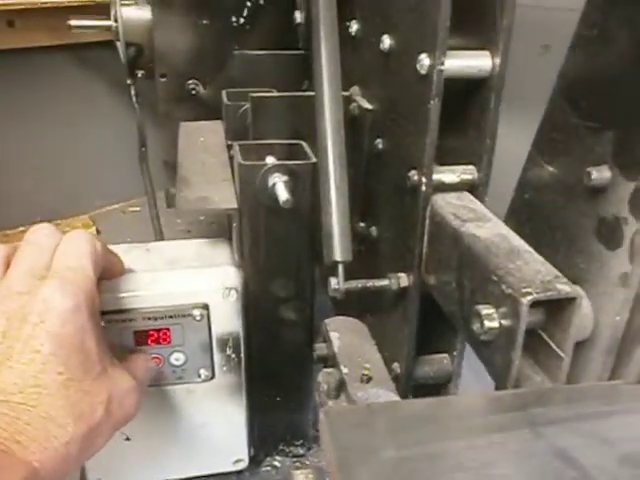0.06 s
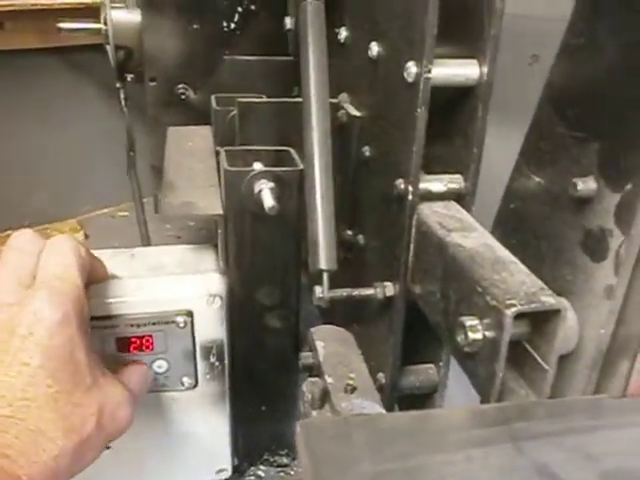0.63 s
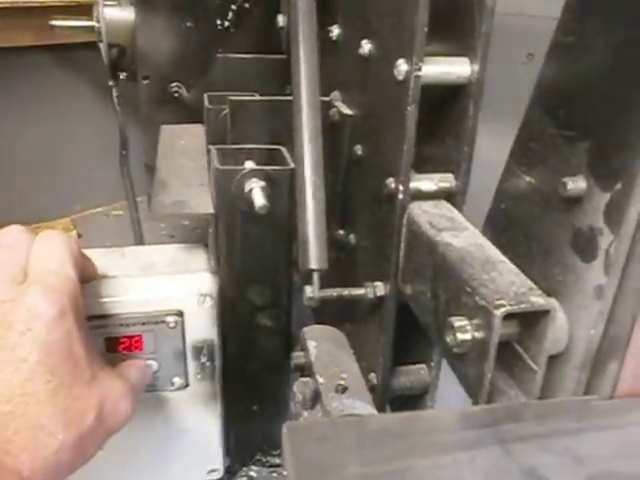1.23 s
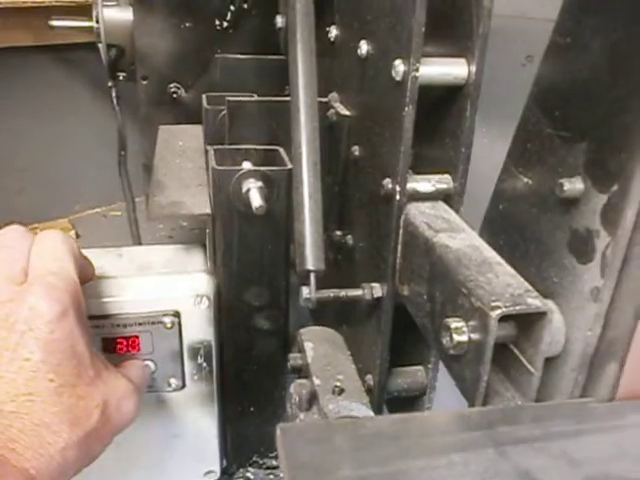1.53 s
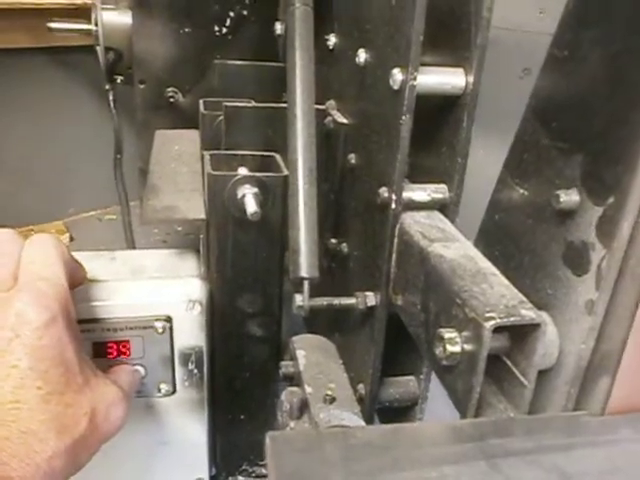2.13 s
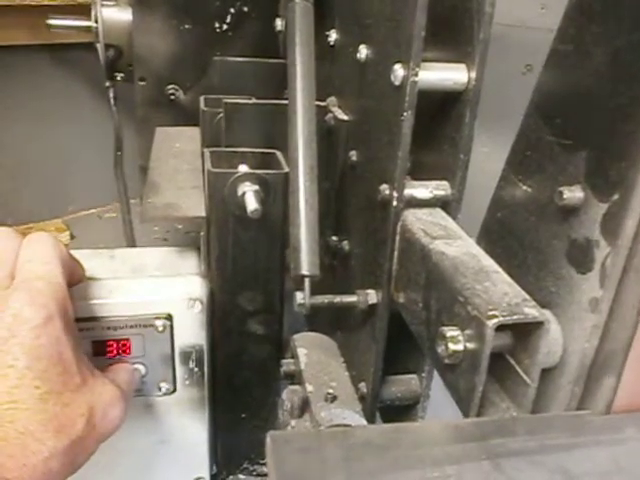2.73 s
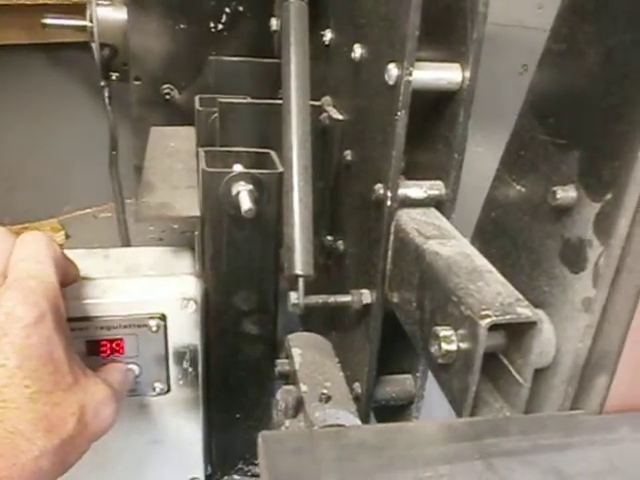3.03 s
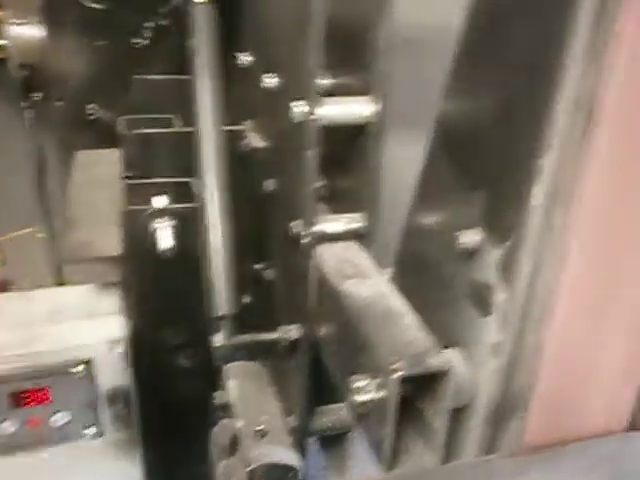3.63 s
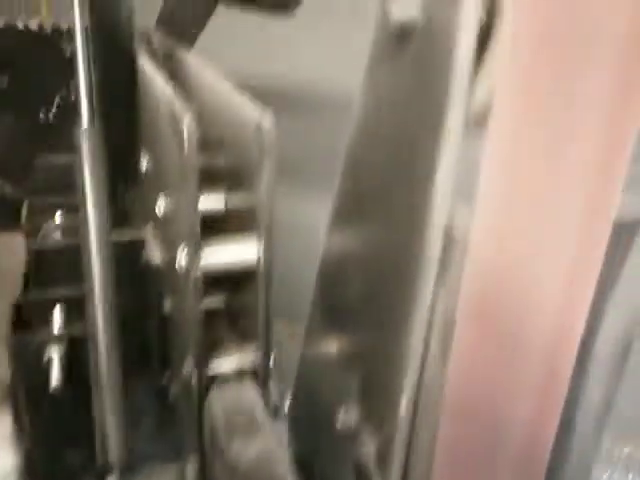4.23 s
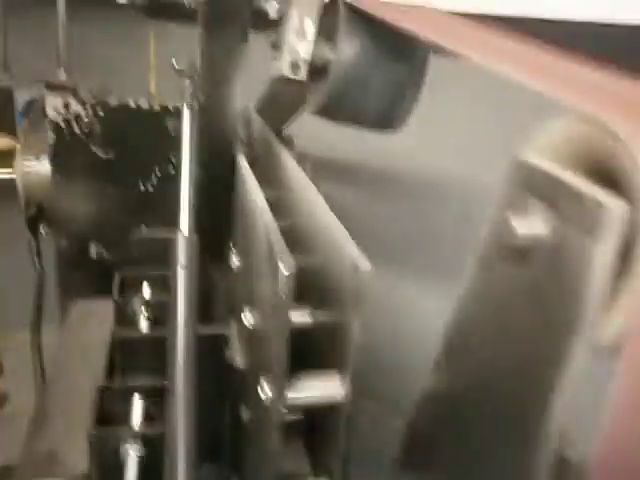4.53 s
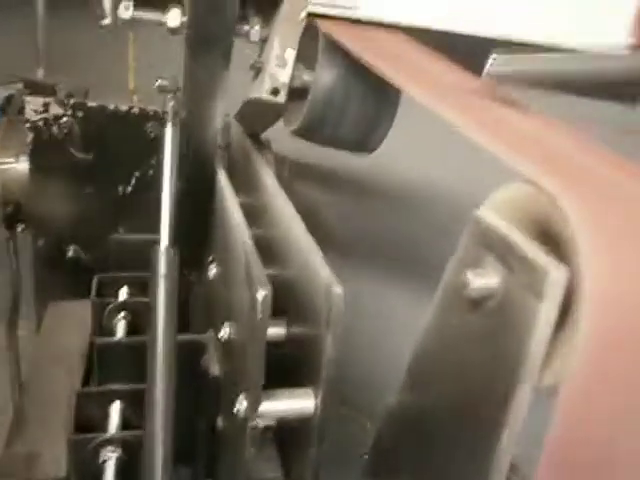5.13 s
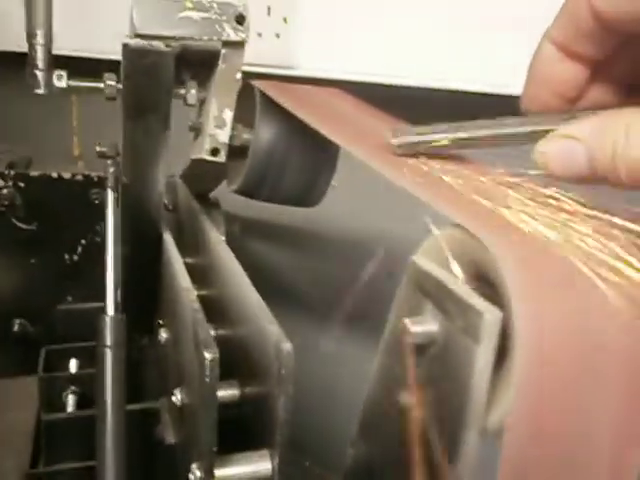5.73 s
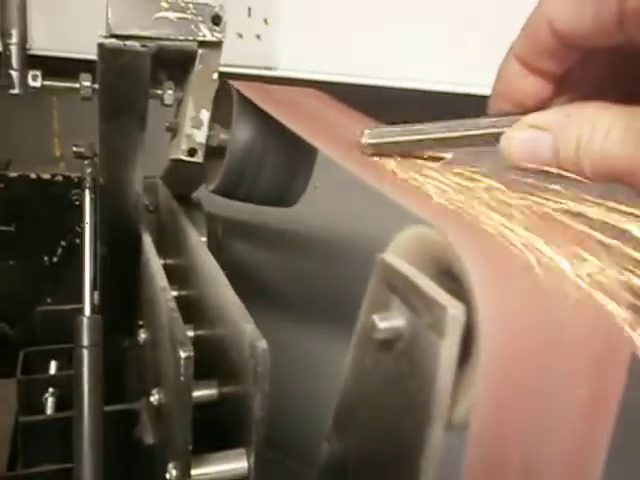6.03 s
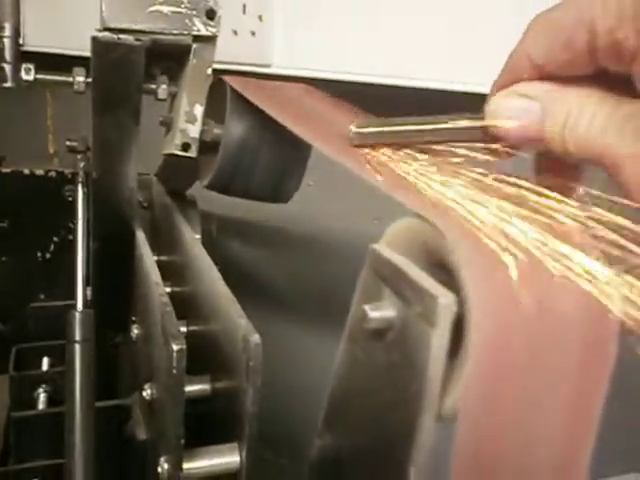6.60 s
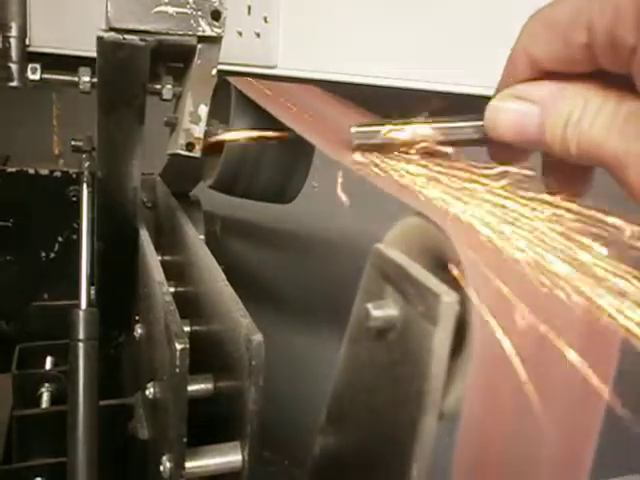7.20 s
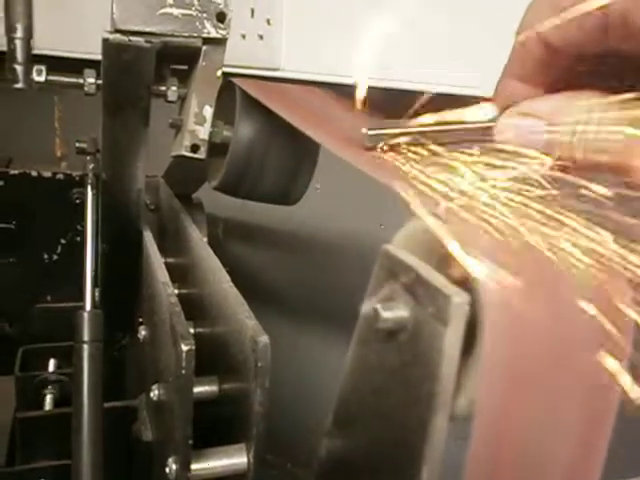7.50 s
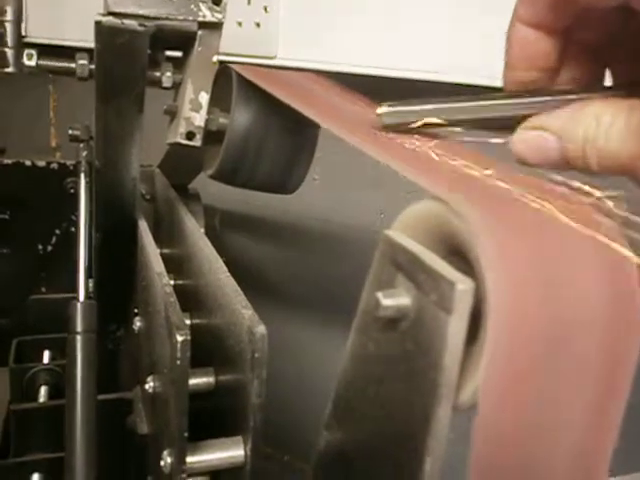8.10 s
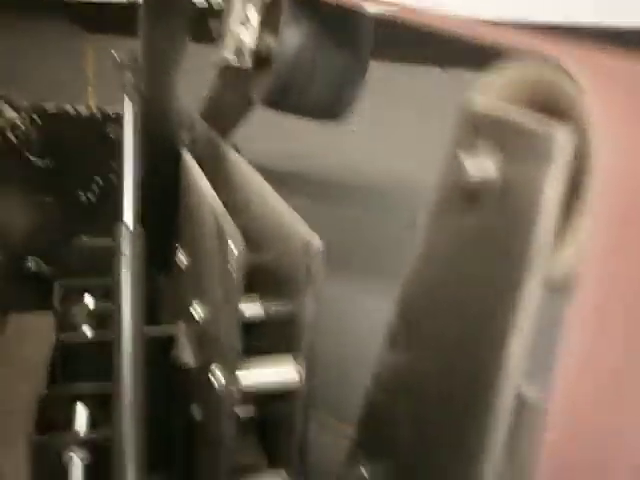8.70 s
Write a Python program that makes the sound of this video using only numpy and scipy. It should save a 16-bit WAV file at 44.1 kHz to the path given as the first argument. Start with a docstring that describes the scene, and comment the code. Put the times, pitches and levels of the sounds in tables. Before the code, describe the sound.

A belt grinder hums and growls up to full speed, rattling and throbbing, then a steel rod rasps against its belt.

```python
"""A home-built belt grinder hums, buzzes and growls while its belt hisses over the wheels.
It is turned up to full speed: the loose steel frame rattles harder and the tool arm chatters.
The microphone moves over to the belt; the off-balance motor now beats (throbs) against the mains hum,
and on each beat the frame rattles and a thin guard plate rings harder. Then a steel rod rasps on the
belt, slowing the motor, and is lifted off. All along, the close microphone is dull and clips on peaks."""
import sys
import numpy as np
from scipy import signal
from scipy.fft import rfft, irfft
from scipy.io import wavfile
from scipy.ndimage import uniform_filter1d, minimum_filter1d

SR = 44100
rng = np.random.default_rng(int(sys.argv[2]) if len(sys.argv) > 2 else 0)


def inscribe(sig):
    """Save sig as 16-bit PCM at rate SR to the path in sys.argv[1].

    A 1-D sig is mono; a 2-D sig holds one channel per row.
    Samples are clipped to [-1, 1] before scaling.
    """
    pcm = np.round(np.clip(np.atleast_2d(sig).T, -1, 1) * 32767)
    wavfile.write(sys.argv[1], SR, pcm.astype(np.int16))


N = 394694
TIME = np.arange(N) / SR
MAINS_HZ, FULL_SPEED_HZ = 50, 100  # the power supply; motor turns per second
FIELD_PER_TURN = 1.023  # the motor's magnetic field spins just ahead of its shaft
LAPS_PER_TURN = .072  # belt laps for each motor turn

# notes at which the steel frame rings: f/Hz, width/Hz, level/dB
FRAME_MODES = [(608, 37, -15), (780, 7.3, -18.5), (905.2, 26.2, 4), (910, 71, -8.5), (1184, 28, -7.5),
               (1248, 98, -1.5), (1470, 62, -2.5), (1608.7, 15.6, 11), (1633.5, 50, -5.5), (1797, 58, -4.5),
               (2378, 84, -23), (3380, 170, -21.5), (3660, 83, -13)]


def undb(db):
    """Turn decibels into a factor to multiply by."""
    return 10 ** (np.asarray(db) / 20)


def unit(x):
    """Scale a signal to an average (rms) level of 1."""
    return x / np.sqrt(np.mean(np.abs(x) ** 2))


def colour(x, spectrum):
    """Shape a sound's lows and highs by (f/Hz, level/dB) points, then scale it to level 1."""
    hz, db = np.transpose(spectrum)
    bin_hz = np.arange(N // 2 + 1) * SR / N
    gain = undb(np.interp(np.log(bin_hz + 1), np.log(hz), db))
    return unit(irfft(rfft(x) * gain, N))


def noise():
    """White noise: an even hiss."""
    return rng.standard_normal(N)


def smooth(x, seconds):
    """A moving average."""
    return uniform_filter1d(x, max(1, int(seconds * SR)))


def wander(per_s):
    """Glide to a new random value per_s times a second; typical size 1."""
    held = rng.standard_normal(4096)[(TIME * per_s).astype(int) % 4096]
    return unit(smooth(held, 1 / per_s))


def bell(x, centre, spread):
    """A smooth hump of height 1."""
    return np.exp(-((x - centre) / spread) ** 2 / 2)


def tone(cycles, db):
    """A pure tone that follows a running count of cycles."""
    return np.sqrt(2) * undb(db) * np.cos(2 * np.pi * cycles)


def ring(x, modes):
    """Let a signal ring an object's own notes, given as (f/Hz, width/Hz, level/dB)."""
    return sum((-1) ** k * undb(db) * signal.lfilter(*signal.iirpeak(hz, hz / width, SR), x)
               for k, (hz, width, db) in enumerate(modes))


def near_belt(move_s=(3.4, 4.35)):
    """Where the microphone is: 0 at the control box, 1 at the belt."""
    return np.interp(TIME, move_s, [0, 1])


def settling(fade_s=.4):
    """Falls from 1 towards 0, so that hum, buzz and rumble start louder."""
    return np.exp(-TIME / fade_s)


def octaves(speed):
    """Doublings of the speed: 0 at full speed, -1 at half."""
    return np.log2(speed / FULL_SPEED_HZ)


def stand_response(hz):
    """How strongly the stand answers a shake at this frequency."""
    # where the stand shakes most easily: f/Hz, width/Hz, level/dB
    stand_modes = [(97.5, 5.9, 0), (118, 3.9, -2.7), (198.7, 5, -4.8)]
    return np.sqrt(sum(undb(db) ** 2 / (1 + ((hz ** 2 - centre ** 2) / (hz * width)) ** 2)
                       for centre, width, db in stand_modes))


def vibration(turns, speed):
    """Off-balance weight, magnetic pull and mains hum shake the frame; close pitches beat."""
    unbalance = undb(-10.1) * (speed / FULL_SPEED_HZ) ** 2 * stand_response(speed)
    pull = undb(-21.4) * stand_response(2 * speed)
    hum = undb(-21.3 - 2.5 * near_belt() + 7.5 * settling())
    parts = [(turns, unbalance), (2 * turns, pull), (2 * MAINS_HZ * TIME, hum)]
    # complex numbers: .real is the sound, abs() is the strength of the shaking
    return np.sqrt(2) * sum(size * np.exp(2j * np.pi * cycles) for cycles, size in parts)


def throb(shake, average_s=.5):
    """Strength of the shaking against its nearby average: above 1 at the top of a beat."""
    strength = np.abs(shake)
    return strength / smooth(strength, average_s)


def mains_buzz(waver_db=2):
    """The power supply buzzes in the control box, fainter once the microphone moves away."""
    # tones of the buzz: multiple of the mains frequency, level/dB
    buzz_tones = [(1, -45), (3, -46.5), (4, -38), (5, -40), (6, -44), (7, -44.5), (8, -44.5), (9, -46),
                  (11, -40.5), (13, -44), (15, -44.5)]
    change_db = -9 * near_belt() + 4 * settling()
    return sum(tone(round(k) * MAINS_HZ * TIME + rng.random(), db + change_db + waver_db * wander(4.7))
               for k, db in buzz_tones)


def belt(turns):
    """The belt hisses over its wheels, a little unevenly on each lap; the bearings rumble."""
    # tone colours of the belt and of the bearings: f/Hz, level/dB
    hiss_spectrum = [(200, -16.5), (400, -2), (560, 0.5), (760, -1.5), (920, 2), (1100, -1), (1450, 1),
                     (2000, -1.5), (2300, -8), (2900, -5), (3300, -2.5), (3600, 0.5), (3950, -5.5),
                     (4400, -24.5)]
    rumble_spectrum = [(20, -47.5), (40, -17), (75, -5), (115, 12), (160, 5.5), (230, -1), (300, -9),
                       (420, -18), (900, -39)]
    hiss_db = -26.5 - 6 * bell(TIME, 3.46, .13)  # the hiss dips briefly
    uneven_db = 1.05 * wander(30) + .17 * np.cos(2 * np.pi * LAPS_PER_TURN * turns)
    rumble_db = -31.5 + 2.5 * near_belt() + 7 * settling()
    hiss = undb(hiss_db + uneven_db) * colour(noise(), hiss_spectrum)
    return hiss + undb(rumble_db) * colour(noise(), rumble_spectrum)


def mount_growl(turns, speed, waver_db=4, drift_cycles=.1):
    """The motor's uneven push sweeps up through the notes of its mount, loudest at middling speeds."""
    # notes of the motor mount: f/Hz, width/Hz, level/dB
    mount_modes = [(207, 29, 1.5), (293, 43, 2), (380, 42, -9.5), (571, 23, 1)]
    # loudness of the growl: motor speed/Hz, level/dB
    growl_levels = [(42, -37.5), (72, -30), (85, -31.5), (97, -49)]
    ripple = sum(tone(k / 2 * FIELD_PER_TURN * turns + drift_cycles * wander(20), waver_db * wander(9))
                 for k in range(4, 28))
    level_db = np.interp(speed, *np.transpose(growl_levels))
    return unit(ring(ripple, mount_modes)) * undb(level_db)


def swell_db():
    """Extra level in the moments when the guard plate rings out."""
    # swells of the ringing: t/s, spread/s, lift/dB
    swells = [(4.12, .14, 6.5), (5.88, 0.12, 10.5), (6.45, 0.11, 6), (8.881, 0.17, 17)]
    return sum(db * bell(TIME, at_s, spread_s) for at_s, spread_s, db in swells)


def rattle_force(turns, speed, shake, wheel_per_turn=.607, swell_share=.26):
    """The frame rattles harder with speed, and on each beat, turn of the free wheel and belt lap."""
    wheel_db = 1.82 * np.cos(2 * np.pi * wheel_per_turn * turns)
    lap_db = .05 * np.cos(2 * np.pi * LAPS_PER_TURN * turns)
    level_db = -22.5 + 17.5 * octaves(speed) + 3 * near_belt()
    return undb(level_db + swell_share * swell_db() + wheel_db + lap_db) * throb(shake) ** .88


def knocks(turns, jitter_s, scatter_db=2.5, return_db=-6):
    """A loose joint knocks at both ends of each swing, softer and less evenly on the way back."""
    swing_ends = np.flatnonzero(np.diff(np.floor(2 * turns)))
    timing, strength = rng.standard_normal((len(swing_ends), 2)).T
    backward = np.arange(len(swing_ends)) % 2 == 0
    offset = (jitter_s * SR * timing * (1 + 2 * backward)).astype(int)
    landing = np.clip(swing_ends + offset, 0, N - 1)
    return np.bincount(landing, undb(scatter_db * strength + return_db * backward), N)


def frame_rattle(turns, force):
    """Knocks ring the steel frame, and small parts clatter once a turn."""
    # tone colour of the small parts: f/Hz, level/dB
    clatter_spectrum = [(300, -31), (600, -6.5), (900, -0.5), (1300, 3), (1700, 2.5), (1950, -11.5),
                        (2500, -7), (3000, -3.5), (3500, -1), (3900, -14), (4200, -18), (4500, -35)]
    blows = knocks(turns, jitter_s=.00009)
    ringing = ring(blows * force, FRAME_MODES) / np.std(ring(blows, FRAME_MODES))
    bursts = noise() * undb(-3.5 * np.cos(2 * np.pi * turns) - wander(250))
    clatter = colour(bursts, clatter_spectrum) * force
    return undb(-6.5) * ringing + undb(-4) * clatter


def arm_chatter(turns, speed, loose_hz=88.4, loose_span_hz=6.9, taps_per_s=1600, lead_s=.014):
    """The tool arm taps in its socket: in lone fits, and on each beat near the speed that loosens it."""
    # lone fits of chatter: t/s, spread/s, level/dB
    fit_times = [(1.694, 0.039, -21.5), (1.88, 0.012, -19), (2.825, 0.019, -21), (3.663, .022, -18),
                 (3.947, 0.022, -21), (7.069, 0.024, -20.5), (7.79, 0.017, -21)]
    # notes of the tool arm: f/Hz, width/Hz, level/dB
    arm_modes = [(750, 150, -8), (943, 55, 0), (1190, 77, -6), (1429, 74, -2), (1615, 54, 2),
                 (1843, 110, -4.5), (2980, 220, -10), (3656, 160, -6)]
    beat = np.abs(np.cos(np.pi * (turns - 2 * MAINS_HZ * TIME)))
    crest = np.interp(TIME + lead_s, TIME, beat) ** 4  # peaks just ahead of each beat
    looseness = undb(-20.5 - 2.5 * near_belt()) * bell(speed, loose_hz, loose_span_hz)
    fits = sum(undb(db) * bell(TIME, at_s, spread_s) for at_s, spread_s, db in fit_times)
    taps = (rng.random(N) < taps_per_s / SR) * undb(3.5 * noise())
    return ring(taps * (looseness * crest + fits), arm_modes) / np.std(ring(taps, arm_modes))


def frame_singing(turns, force, level_db=-27, waver_db=1.5):
    """High motor tones sing when they meet a note of the frame, far more when it is shaken hard."""
    # tones that can sing: multiple of the motor speed, level/dB
    singing_tones = [(9, 0), (13, -1), (16, -2), (17, 3)]
    wobble = .017 * wander(45)  # the shaft turns unevenly, roughening the highest tones most
    tones = sum(tone(round(k) * (turns + wobble), db + waver_db * wander(12)) for k, db in singing_tones)
    return undb(level_db) * unit(ring(tones * force ** 2, FRAME_MODES))


def motor_whine(turns, speed, waver_db=3, drift_cycles=.027):
    """The shaft and its magnetic field give fluttering tones that come up only near full speed."""
    # tones of the shaft and of the field: multiple of its own speed, level/dB
    shaft_tones = [(3, -39.5), (4, -42.5), (8, -38.5)]
    field_tones = [(5, -37.5), (6, -37.5), (7, -45)]
    shaft = sum(tone(round(k) * turns + drift_cycles * wander(25), db + waver_db * wander(12))
                for k, db in shaft_tones)
    field = sum(tone(k * FIELD_PER_TURN * turns + drift_cycles * wander(25), db + waver_db * wander(12))
                for k, db in field_tones)
    return (shaft + field) * (speed / speed.max()) ** 8


def guard_plate(turns, speed, shake):
    """A thin guard plate is tapped on every swing, harder on each beat; its two close notes beat too."""
    # notes of the plate: f/Hz, width/Hz, level/dB
    plate_modes = [(1626.4, 22, 3), (1661.5, 24, 2)]
    taps = knocks(turns, jitter_s=.00022)
    level_db = -32 + 45 * octaves(speed) + swell_db()
    return unit(ring(taps, plate_modes)) * throb(shake) * undb(level_db)


def rod_grinding(shake, touch_s=5.33, lift_s=8.0, ease_db_per_s=2.9, grits_per_s=2500):
    """Grits on the belt tear at the rod in dense, unequal clicks, hardest at first and on each beat."""
    # tone colour of the rasp: f/Hz, level/dB
    rasp_spectrum = [(400, -20), (1200, 5), (2200, -2.5), (3400, -4.5), (3900, 0.5), (4400, -18)]
    clicks = (rng.random(N) < grits_per_s / SR) * np.sign(noise())
    sizes = undb(4 * np.minimum(rng.exponential(size=N), 5))
    contact = np.interp(TIME, [touch_s, touch_s + .13, lift_s, lift_s + .1], [0, 1, 1, 0])
    pressure = contact * undb(-25.5 - ease_db_per_s * (TIME - touch_s))
    bite = np.sqrt(throb(shake, average_s=.4)) * undb(wander(12))
    return colour(clicks * sizes, rasp_spectrum) * pressure * bite


def scene():
    """One motor speed drives every moving part of the machine."""
    # the motor is turned up by hand and sags under the rod: t/s, speed/Hz
    speed_points = [(0.0, 43.87), (0.33, 40.51), (0.92, 48.0), (1.35, 49.6), (1.62, 52.85), (2.33, 66.83),
                    (2.55, 73.79), (3.21, 89.57), (3.76, 95.18), (4.44, 99.01), (5.41, 100.25),
                    (6.2, 98.09), (6.96, 96.05), (7.9, 95.92), (8.95, 99.3)]
    speed = np.interp(TIME, *np.transpose(speed_points))
    turns = np.cumsum(speed) / SR
    shake = vibration(turns, speed)
    force = rattle_force(turns, speed, shake)
    drive = shake.real + motor_whine(turns, speed) + mount_growl(turns, speed) + mains_buzz()
    frame = frame_rattle(turns, force) + frame_singing(turns, force)
    loose_parts = guard_plate(turns, speed, shake) + arm_chatter(turns, speed)
    return (drive + frame + loose_parts + belt(turns) + rod_grinding(shake))[None]


def record(dry, dull_hz=4300, limit=.74, ceiling=.72, top_hz=15800):
    """A dull microphone with a fast limiter that turns peaks down; the tips clip into faint crackles."""
    dull = signal.sosfiltfilt(signal.cheby1(10, .05, dull_hz, fs=SR, output="sos"), dry)
    allowed_gain = limit / np.maximum(np.abs(dull), limit)
    gain = smooth(minimum_filter1d(allowed_gain, size=int(.004 * SR)), .006)
    clipped = np.clip(dull * gain, -ceiling, ceiling)
    from_edge_s = np.minimum(TIME, TIME[::-1])
    fades = np.sin(np.pi / 2 * np.minimum(from_edge_s / .004, 1)) ** 2
    return signal.sosfilt(signal.ellip(8, .1, 70, top_hz, fs=SR, output="sos"), clipped * fades)


dry = scene()
out = record(dry)
inscribe(out)
```